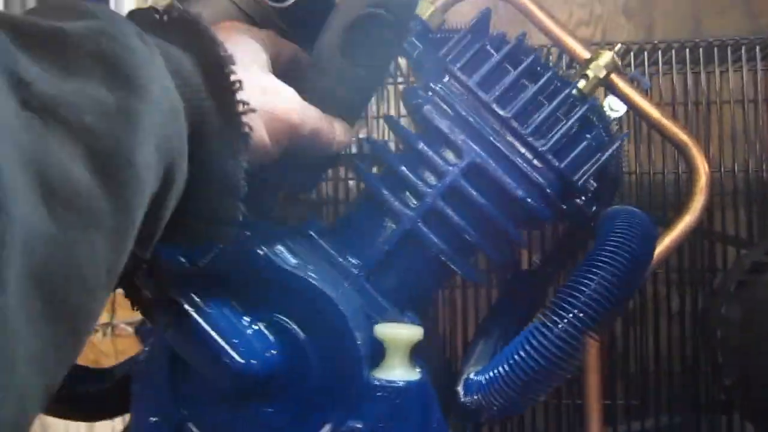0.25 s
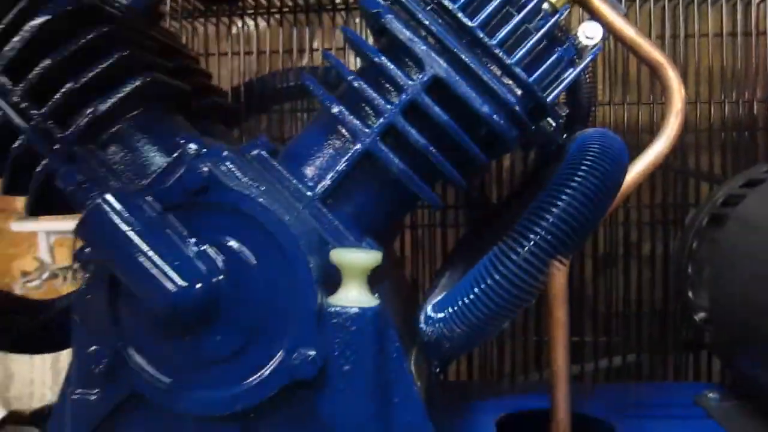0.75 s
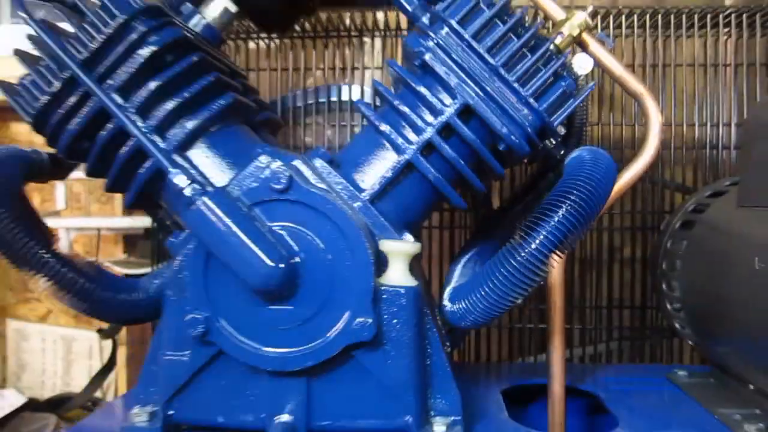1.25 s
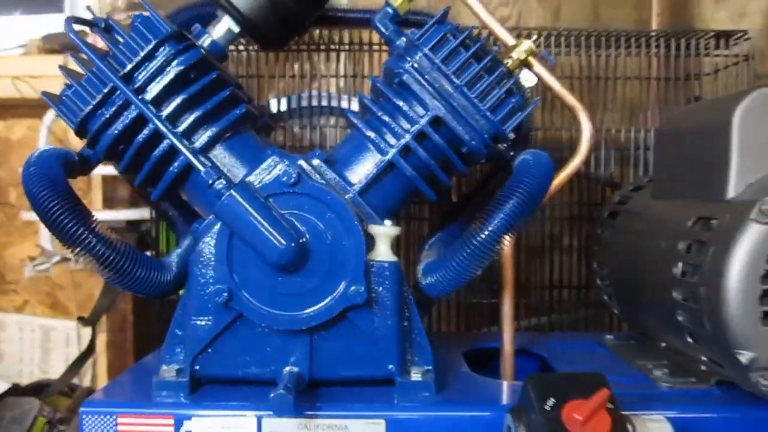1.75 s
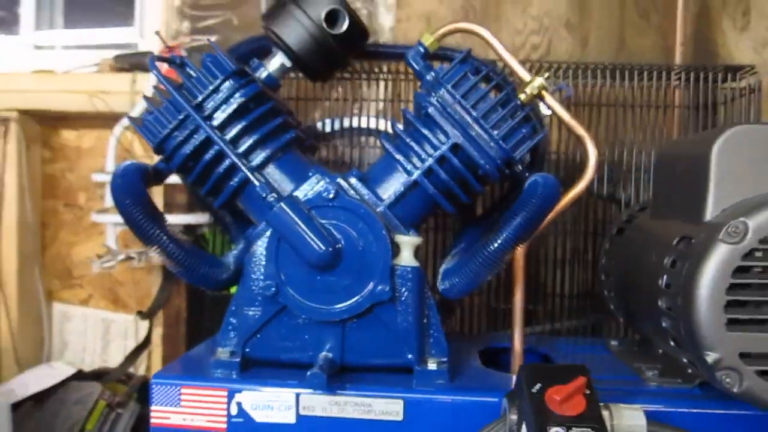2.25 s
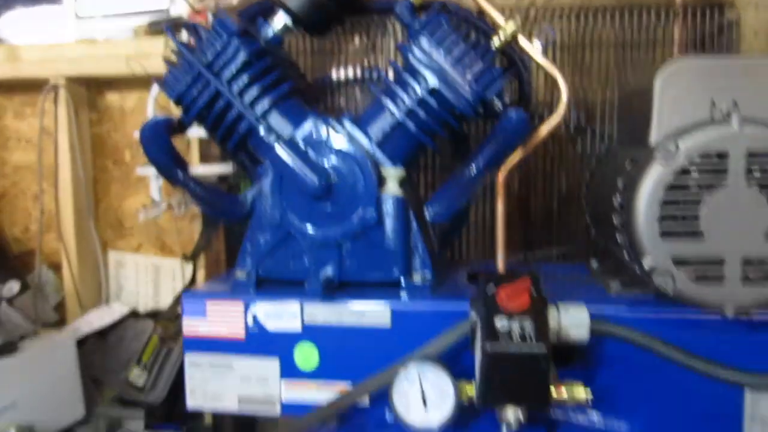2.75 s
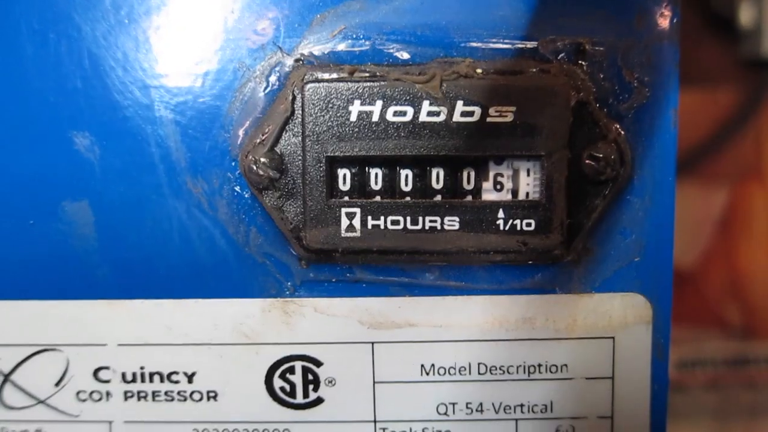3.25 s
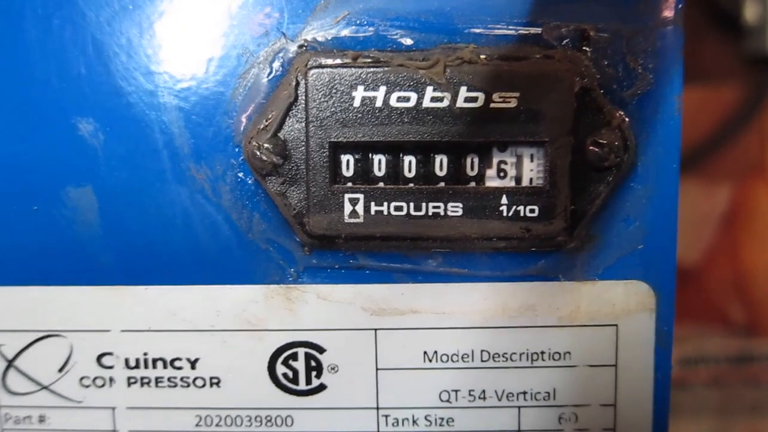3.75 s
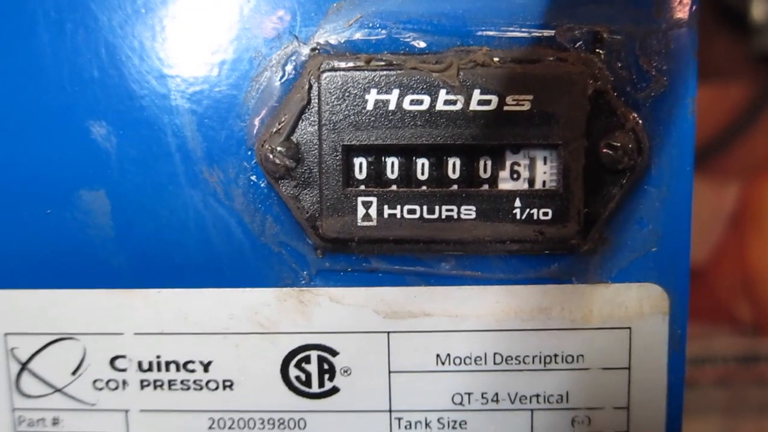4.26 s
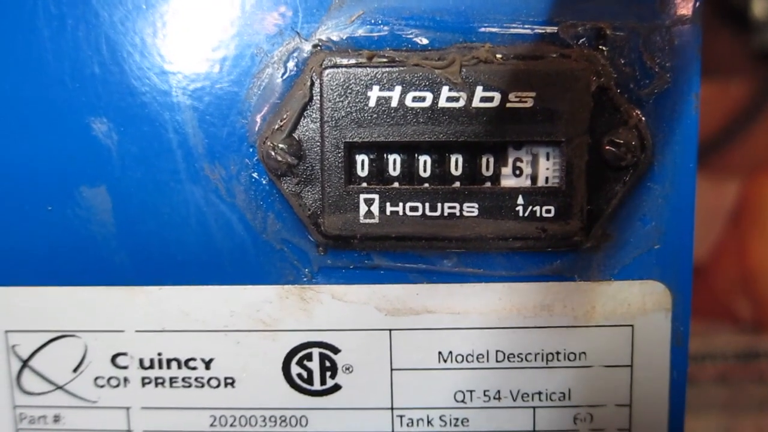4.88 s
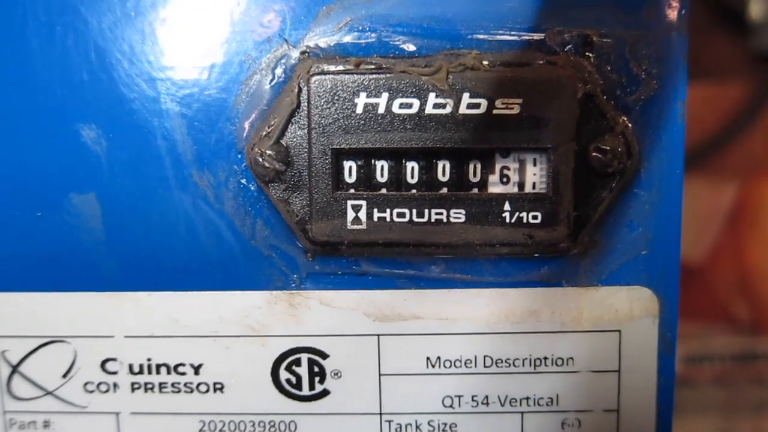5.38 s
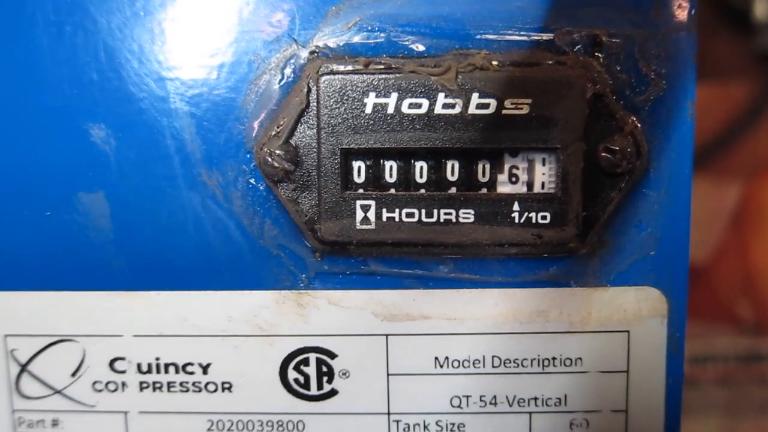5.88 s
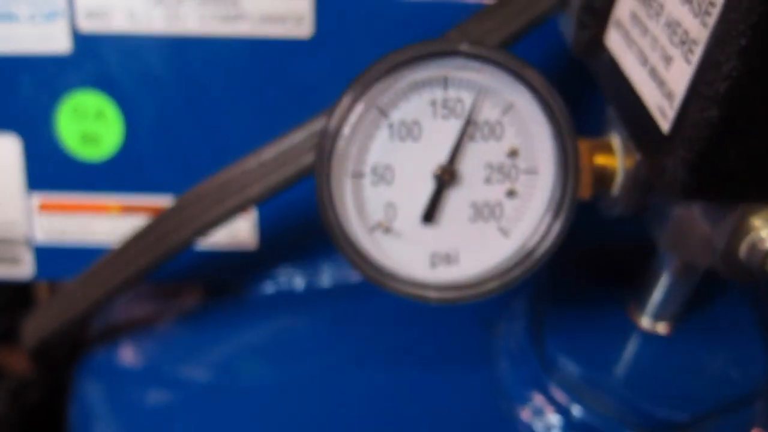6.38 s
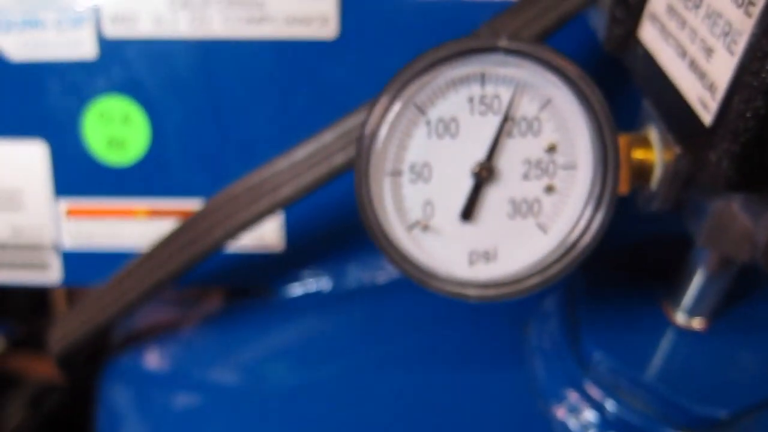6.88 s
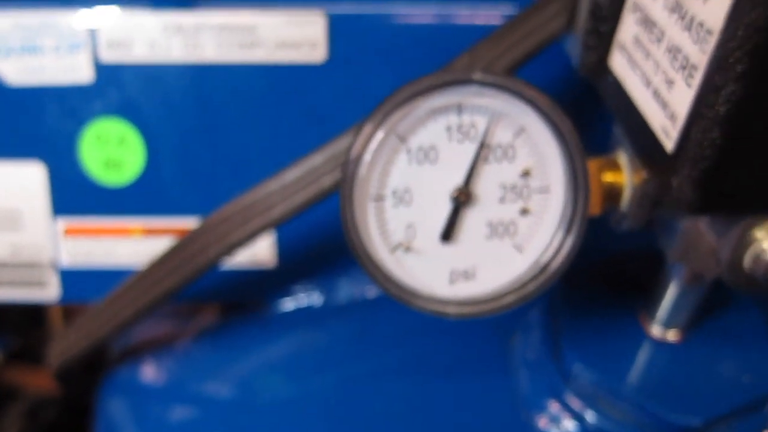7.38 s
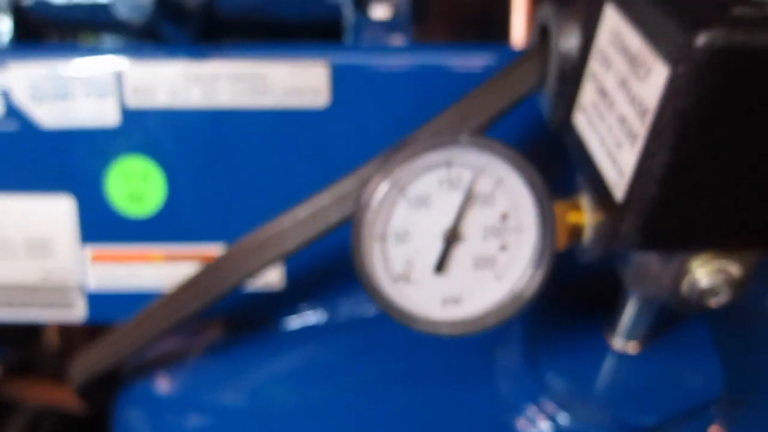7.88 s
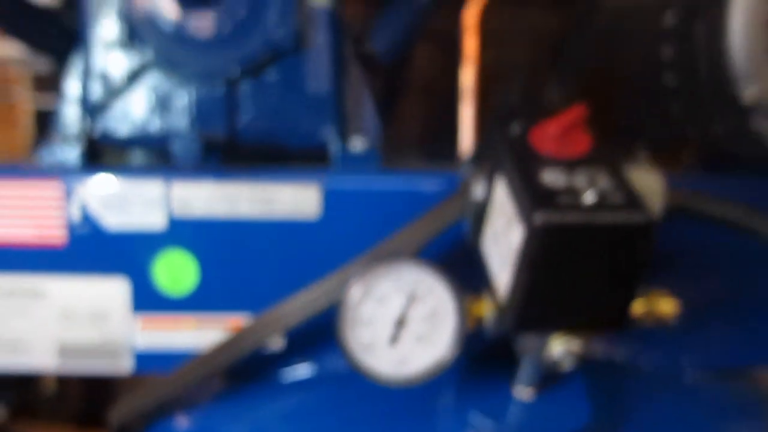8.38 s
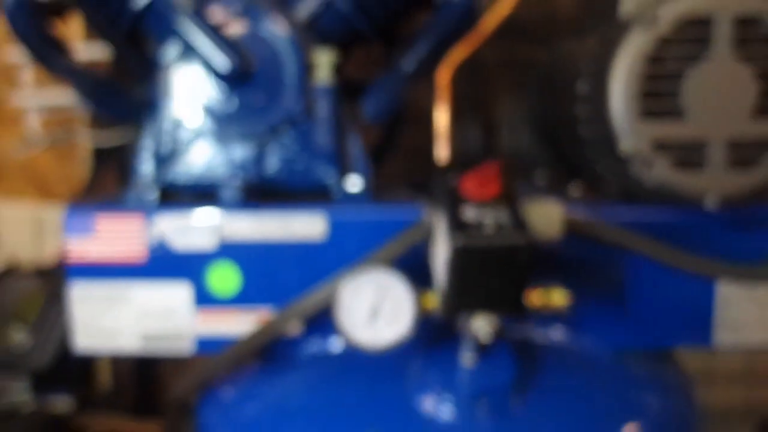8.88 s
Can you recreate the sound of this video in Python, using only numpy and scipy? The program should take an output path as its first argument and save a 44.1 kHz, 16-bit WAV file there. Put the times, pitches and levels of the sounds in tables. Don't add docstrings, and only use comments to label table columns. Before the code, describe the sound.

In a garage, a two-cylinder air compressor runs very close to a handheld stereo microphone, chugging fast with clattering fins and slapping valves. An abrupt cut moves to the tank, where motor whine and ringing steel come forward. Another cut: motor off, a strong air jet hisses, changes colour, weakens and leaves near silence.

```python
import sys
import numpy as np
from scipy import signal
from scipy.fft import rfft, irfft, next_fast_len
from scipy.io import wavfile

SR = 44100
rng = np.random.default_rng(int(sys.argv[2]) if len(sys.argv) > 2 else 0)


def voltage_ratio(decibels):
    exponent = np.asarray(decibels, float) / 20
    return 10 ** exponent


def store_pcm(level_fs):
    pcm = np.round(np.clip(level_fs, -1, 1) * 32767).astype(np.int16)
    wavfile.write(sys.argv[1], SR, np.atleast_2d(pcm).T)


N = 403074
TIME = np.arange(N) / SR
TO_TANK_S, TO_SWITCH_S = 3.054, 6.170

# time in seconds, closeness in dB,
# view of the cooling fins in dB.
HEAD_DRIFT = [(0.0, 0, 1), (0.6, 1.5, 0), (1.0, 0, 0.7), (1.3, -0.5, 0), (2.0, -1.6, 1), (2.5, -.5, 1.5),
              (3.05, 0.4, 2.5)]
TANK_DRIFT = [(3.05, -0.12, -0.0045), (3.6, 0.71, .3), (3.85, -0.82, -0.56), (4.05, 0.54, 0.44),
              (4.35, 0.43, -.3), (4.8, 0.76, 0.89), (5.1, -0.15, -0.16), (5.8, .4, 0.1), (6.17, -0.57, -.3)]
# level in dB, share of closeness, share of fin view.
HEAD_LAYERS = [
    (-21.5, 0.87, .1),
    (-24.5, 1.1, 0.49),
    (-26.5, .2, 1),
    (-34.5, .5, .6),
]
TANK_LAYERS = [
    (-26, 1.05, .1),
    (-19.5, .9, .1),
    (-28.5, .6, 1),
    (-36.5, .6, .6),
]
# multiple of the stroke rate, level in dB.
HEAD_INTAKE = [(1, -9), (2, -1.5), (3, 4), (4, 5), (5, 5.5), (6, 1), (7, 0.5), (8, 5.5), (9, -9), (10, -6),
               (11, -13), (12, -16), (13, 3)]
TANK_INTAKE = [(1, -23), (2, -8), (3, 1.5), (4, -14.5), (5, 3), (6, -0.5), (7, -1.5), (8, 1), (9, -12.5),
               (10, -37), (11, -51.5)]
# mode in Hz, level in dB, t60 in seconds, moment in turns.
HEAD_STEEL = [(2467, -21, .07, .85), (2496, -26.5, 0.04, .35), (656, -24, 0.047, .4),
              (980, -30.5, 0.034, .33), (787, -31.5, 0.14, 0.34), (2165, -20.5, 0.02, 0.79),
              (3750, -32, .06, .36), (4460, -25, 0.016, .87), (10060, -21.5, 0.013, .86)]
TANK_STEEL = [(573.3, -7.5, 0.049, 0.91), (767, -30.5, 0.35, 0.012), (994, -30.5, 0.16, 0.1017),
              (1110, -28.5, 0.053, 0.25), (1229, -21.5, 0.12, .15), (1490, -30.5, 0.062, .25),
              (1620, -30.5, 0.043, .3), (2703, -28.5, 0.12, 0.4), (2320, -27.5, 0.25, .5),
              (9680, -18.5, 0.01, 0.32)]
# multiple of rotor speed, multiple of mains, level in dB rms, wobble in dB.
HEAD_MOTOR = [(0, 2, -31.5, 1), (12, 0, -33, -2.5), (15.96, 0, -58, 3.5), (20.01, 0, -31, .5),
              (20.18, 2, -29.5, -5.5), (21, 2, -41.5, -6), (21.87, 2, -38.5, -3)]
TANK_MOTOR = [(0, 2, -32, .4), (1, 0.47, -56.5, 1.5), (2.97, 0.24, -43.5, 1.5), (12.08, 0, -39, 0.99),
              (19.9, 0, -35.5, 2.5), (19.28, 2, -45.5, 1.9), (20, 2, -18, 0.44), (21.05, 2, -33, 1.7),
              (22.22, 2, -35.5, 2.3)]
# frequency in Hz, density in dB per Hz.
HEAD_CLATTER = [(32, -55), (55, -11), (300, -4.5), (650, -1.5), (1250, -3.5), (1650, -7), (2000, -6),
                (2500, 1), (2900, -3), (5000, -5), (5800, -9.5), (8000, -15), (12000, -43)]
TANK_CLATTER = [(30, -54), (50, -14), (80, -11), (300, -11), (550, -2.5), (1250, -3.5), (1600, -6),
                (2300, 0.5), (3300, -2.5), (5200, -2.5), (5800, -7), (8000, -12.5), (12000, -39)]
HEAD_HISS = [(5000, -70), (8000, -10), (10000, -3.5), (11200, -3.5), (13600, -5), (14400, -11),
             (15200, -22), (16000, -60)]
TANK_HISS = [(5000, -56), (8000, -14.5), (9900, -2), (10600, -3.5), (13700, -6.5), (14400, -13),
             (15000, -43), (16000, -63)]
# frequency in Hz, likeness from 0 to 1.
HEAD_ALIKE = [(100, 0.8), (700, 1), (1500, 0.63), (2400, 0.77), (3000, 0.51), (6000, 0.28), (12000, 0.17)]
TANK_ALIKE = [(100, 0.27), (1200, 1), (2000, 0.24), (5000, 0.16), (12000, 0.1)]
# time in seconds, jet level in dB.
PRESSURE = [(6.17, -22.5), (6.5, -24), (7.0, -25), (7.5, -27.5), (8.0, -33), (8.4, -36), (8.75, -40),
            (9.14, -42.5)]
# time in seconds, tilt from 0 to 1, slant to the jet from 0 to 1.
HAND = [(6.17, 0.04, 0.97), (6.6, 0.05, 1.), (7.1, 0.31, 0.96), (7.3, .85, 0.99), (7.5, 1., 0.95),
        (8.0, 0.9, 0.86), (8.15, 0.8, 0.88), (8.42, 0.32, 0.54), (8.75, .2, 0.32)]
# time in seconds, length in seconds, then low, middle and upper ridge gain in dB.
SWAYS = [
    (6.76, .06, -4, 1, 0.5),
    (6.859, .04, 8, 1, 2.5),
    (7.044, 0.096, -10, 2.5, -0.5),
    (7.196, .07, 1.5, -2.3, 5),
    (7.998, 0.18, 3.5, 2, 0),
]
# time in seconds, rise in seconds, lift in Hz, fall in seconds.
GAPS = [
    (6.79, 0.14, 600, .07),
    (7.18, .12, 570.4, .3),
]
# centre in Hz, width in Hz, level in dB, gain by tilt in dB,
# right port lead in radians, left over right in dB, gain facing the jet in dB.
RIDGES = [(3290, 460, -4.5, 2.5, 0.92, -2.5, -27), (4700, 620, 2.5, 4, 0.81, 0.5, -4),
          (6550, 1000, 1, 1.5, 1.1, -2, 0.3), (9240, 790, -10, -3, 1.7, 9, -14),
          (10900, 1500, 3, -1.5, 3.63, -0.5, -1.5), (13250, 900, -2.5, 3, 3.8, -2, -4),
          (15480, 500, -17, 14, 5.7, 1, 20)]
# frequency in Hz, density in dB per Hz.
JET_COLOUR = [(1000, -35), (1800, -12), (2300, 2), (3600, 4.5), (5700, 1), (7000, -6.5), (9700, -7.5),
              (12000, -5), (14600, -7), (15700, -19), (16000, -55)]
BUFFET_COLOUR = [(15, -48), (25, -9), (232, 0), (651, 1), (831, 1), (1760, 0), (2200, 0), (2860, -19),
                 (4840, -120)]
ROOM_COLOUR = [(25, -8), (60, -3), (200, -4), (450, -5), (780, 2), (1200, 2), (1900, 6.5), (2400, -34)]
# time in seconds, length in seconds, depth in dB.
LULLS = [
    (6.55, 0.025, -1),
    (6.977, 0.033, -4),
]
# time in seconds, level in dB, pitch in Hz.
BUMPS = [
    (8.405, -46, 195),
    (8.645, -57, 190),
    (8.685, -57, 161),
    (8.72, -64, 80),
]


def in_time(rows):
    s, *columns = np.transpose(rows)
    return [np.interp(TIME, s, column) for column in columns]


def at_hz(points, hz):
    point_hz, value = np.transpose(points)
    return np.interp(np.log(hz + 1), np.log(point_hz), value)


def bell(s, length_s):
    return np.exp(-((TIME - s) / length_s) ** 2)


def pan(db):
    return voltage_ratio(np.array([[0.5], [-0.5]]) * db)


def drift(rate):
    r = np.exp(-80 * np.pi * rate / SR)
    slow = signal.lfilter([1], [1, -2 * r, r * r], rng.standard_normal(N // 40 + 4002))[4000:]
    return np.interp(np.arange(N) / 40, np.arange(len(slow)), slow / slow.std())


def butter(sound, order, hz, kind):
    return signal.sosfilt(signal.butter(order, hz, kind, fs=SR, output="sos"), sound)


def noise(spectrum, alike, left_lag=0., turn_hz=1, repeat=0., blur_hz=5000):
    size = next_fast_len(N)
    hz = np.fft.rfftfreq(size, 1 / SR)
    shared, left, right = rfft(rng.standard_normal((3, size)))
    share = np.clip(at_hz(alike, hz), 0, 1)
    late = np.exp(-2j * np.pi * hz * left_lag / SR)
    pair = np.sqrt(share) * shared * [late, np.ones_like(late)]
    pair = pair + np.sqrt(1 - share) * np.array([left, right])
    again = np.clip(repeat, 0, .9) * np.exp(-hz / blur_hz)
    pair = pair * np.sqrt(1 - again ** 2) / (1 - again * np.exp(-2j * np.pi * hz / turn_hz))
    out = irfft(pair * voltage_ratio(at_hz(spectrum, hz)), size)[:, :N]
    return out / out.std()


def ridge(hz, width_hz, lead, own):
    base = rng.standard_normal((3, N)) + 1j * rng.standard_normal((3, N))
    base = butter(base, 3, 500, "low")
    stretched = np.cumsum(np.broadcast_to(width_hz / 1000, N)) % (N - 1)
    shared, left, right = [np.interp(stretched, np.arange(N), b) for b in base]
    pair = np.array([shared * np.exp(-1j * lead) + own * left, shared + own * right])
    cycles = np.cumsum(np.broadcast_to(hz, N)) / SR
    out = np.real(pair * np.exp(2j * np.pi * cycles))
    return out / out.std()


def wash_db():
    withdraw_s = 7.52
    sag = -3.5 * (TIME - TO_SWITCH_S)
    drop = -17 * (.5 + .5 * np.tanh((TIME - withdraw_s) / .15))
    fade = -8.5 * np.clip(TIME - withdraw_s, 0, None)
    lulls = sum(db * bell(s, length_s) for s, length_s, db in LULLS)
    return -28.5 + sag + drop + fade + lulls


def quiet_garage():
    away = np.clip((TIME - 7.52) / 0.3, 0, 1)
    wash = (1 - away) * voltage_ratio(5.5 + 0.44 * drift(12)) * noise(BUFFET_COLOUR, [(100, 0.32), (2000, 0.22)])
    room = away * voltage_ratio(7.5) * noise(ROOM_COLOUR, [(100, .98), (200, 0.99)])
    hum = voltage_ratio(-64 + 1.4 * drift(4)) * np.sin(2 * np.pi * 310 * TIME + 0.76 * drift(8.9))
    bumps = np.zeros(N)
    for s, db, hz in BUMPS:
        bumps += voltage_ratio(db) * bell(s + .01, 1.13 / hz) * np.sin(2 * np.pi * hz * (TIME - s))
    gust = voltage_ratio(-32.5) * bell(6.58, .12) * ridge(240, 90, 0., 1.0)
    return voltage_ratio(wash_db()) * (wash + room) + hum + bumps + gust


def stepping_back():
    tone = np.sqrt(2) * np.sin(2 * np.pi * 3620 * TIME + 0.52 * drift(7.3))
    whistle = voltage_ratio(-35) * bell(2.9, .14) * tone
    breath = voltage_ratio(-29) * bell(2.94, .4) * ridge(4100, 1000, 0., .6)
    return whistle + breath


def low_ridge(low_db, low_sway_db, tilt, aslant):
    lift_hz = np.zeros(N)
    for s, rise_s, hz, fall_s in GAPS:
        lift_hz += hz * np.where(TIME < s, bell(s, rise_s), np.exp(-np.abs(TIME - s) / fall_s))
    width_hz = 950 * (1 - .25 * tilt) - 56 * np.clip(low_sway_db, None, 4.0)
    band = ridge(2582 + lift_hz, width_hz, .5 * aslant, 0.23 * aslant)
    return voltage_ratio(low_db + .5 * drift(30)) * band * pan(-2.4 * tilt)


def steady_ridges(jet_db, sways_db, tilt, aslant):
    out = np.zeros((2, N))
    for row, sway_db in zip(RIDGES, sways_db):
        hz, width_hz, trim_db, tilt_db, lead, pan_db, facing_db = row
        gain_db = jet_db + sway_db + trim_db + tilt_db * tilt + facing_db * (1 - aslant) + .5 * drift(18)
        band = ridge(hz, width_hz, lead * aslant * (1 - 0.034 * tilt), 0.39 * aslant * (1 - 0.55 * tilt))
        out += voltage_ratio(gain_db) * band * pan(pan_db)
    return out


def sliding_band():
    slide = (TIME - 7.07) / 0.12
    hz = 4640 - 238 * np.clip(slide + 1, 0, 3) ** 2
    return voltage_ratio(-21.5) * np.exp(-slide ** 2) * ridge(hz, 330, .8, 0.33) * voltage_ratio([[-2.5], [1.5]])


def unloader():
    jet_db, = in_time(PRESSURE)
    tilt, aslant = in_time(HAND)
    low, middle, upper = sum(bell(s, length_s) * np.array(db)[:, None] for s, length_s, *db in SWAYS)
    low_db = jet_db + low + 2.5 + 8 * tilt - 23.5 * (1 - aslant)
    out = low_ridge(low_db, low, tilt, aslant)
    out += steady_ridges(jet_db, [.4 * low, middle, upper, 0, 0, 0, 0], tilt, aslant)
    out += sliding_band()
    between_db = jet_db + (middle + upper) / 2 - 0.5 * tilt * aslant + 4.5
    out += voltage_ratio(between_db) * noise(JET_COLOUR, [(2000, 1.0), (9000, 0.18)], 0.47)
    passed = butter(out, 3, 1690, "high")
    return passed + voltage_ratio(-21.5) * out + voltage_ratio(low_db - 27) * ridge(1500, 1400, .2, 0.23)


def motor(rotor_hz, tones):
    out, slip = np.zeros(N), 0.0036 * drift(1.9)
    for rotor, mains, db, wobble_db in tones:
        hz = round(rotor) * rotor_hz + round(mains) * 60.0
        cycles = hz * TIME + rotor * slip + rng.random()
        waver_db = np.clip(wobble_db, 0, 2) * 2.5 * np.tanh(drift(2.2) / 0.65)
        out += np.sqrt(2) * voltage_ratio(db + waver_db) * np.sin(2 * np.pi * cycles)
    return out


def ring(clicks, hz, t60):
    r, w = voltage_ratio(-60 / (t60 * SR)), 2 * np.pi * hz / SR
    return signal.lfilter([0, np.sin(w)], [1, -2 * r * np.cos(w), r * r], clicks + 1e-18)


def steel(crank_hz, modes, spread_db, rise):
    out, count = np.zeros(N), np.arange(int(N / SR * crank_hz) - 1)
    for hz, db, t60, moment in modes:
        clicks = np.zeros(N)
        slap = ((count + moment) / crank_hz * SR).astype(int)
        clicks[slap] = voltage_ratio(db + spread_db * rng.standard_normal(len(count)))
        swelling = ring(clicks, hz, rise / hz)
        out += ring(swelling, hz, t60) * 2 * np.log(1000) * hz / rise / SR
    return out


def intake(turns, orders, shape, wobble_db):
    start, lead, sweep = shape
    out = np.zeros(N)
    for k, db in orders:
        cycles = 2 * k * turns + start + lead * k + sweep * k * k
        out += voltage_ratio(db + wobble_db * drift(15.0)) * np.cos(2 * np.pi * cycles)
    return out / out.std()


def running(crank_hz, rotor_hz, curve, layers, orders, shape, modes, tones, clatter, hiss, alike,
            left_lag, puff_db, puff_turn, pan_db, repeat):
    close_db, view_db = in_time(curve)
    thump_db, frame_db, clatter_db, hiss_db = [db + close * close_db + view * view_db
                                               for db, close, view in layers]
    turns = crank_hz * TIME
    puff = puff_db * np.cos(2 * np.pi * (turns - puff_turn))
    stroke = 0.37 * np.cos(4 * np.pi * (turns - puff_turn))

    body = voltage_ratio(thump_db + 1.25) * intake(turns, orders, shape, 0.41)
    body += voltage_ratio(0.3 * close_db + 0.586 * view_db) * steel(crank_hz, modes, 0.93, rise=24.3)
    body += voltage_ratio(1.45 * close_db - .5 * view_db) * motor(rotor_hz, tones)
    late = np.interp(np.arange(N) - left_lag, np.arange(N), body)

    rattle = noise(clatter, alike, left_lag, crank_hz, repeat, blur_hz=9000)
    frame = butter(rattle, 2, 1400, "low")
    fins = butter(rattle, 2, 1400, "high")
    air = voltage_ratio(stroke) * (voltage_ratio(frame_db + 3) * frame - voltage_ratio(clatter_db + 2) * fins)
    air += voltage_ratio(hiss_db + 5.0 + puff) * noise(hiss, alike, left_lag)
    return (np.array([late, body]) + air) * pan(pan_db)


def scene():
    head = running(22.522, 57.78, HEAD_DRIFT, HEAD_LAYERS, HEAD_INTAKE, (-.43, .182, .0068), HEAD_STEEL,
                   HEAD_MOTOR, HEAD_CLATTER, HEAD_HISS, HEAD_ALIKE,
                   left_lag=-0.58, puff_db=0.5, puff_turn=0.94, pan_db=0.0, repeat=0.63)
    tank = running(22.571, 57.90, TANK_DRIFT, TANK_LAYERS, TANK_INTAKE, (.43, 0., 0.), TANK_STEEL,
                   TANK_MOTOR, TANK_CLATTER, TANK_HISS, TANK_ALIKE,
                   left_lag=-1.49, puff_db=1.2, puff_turn=0.66, pan_db=1.2, repeat=0.38)
    head += stepping_back()
    tank *= voltage_ratio(3.5 * np.exp(-np.abs(TIME - TO_TANK_S) / 0.016))
    switch = unloader() + quiet_garage()
    splice_s = 0.0029
    first, second = [np.clip((TIME - cut) / splice_s + .5, 0, 1) for cut in (TO_TANK_S, TO_SWITCH_S)]
    return head * (1 - first) + tank * (first - second) + switch * second


def band_limit(x):
    return signal.sosfilt(signal.butter(12, 15910, fs=SR, output="sos"), x)


def record(dry):
    notch_hz, width_hz = 8270, 1150
    notched = butter(dry, 3, [notch_hz - width_hz / 2, notch_hz + width_hz / 2], "bandstop")
    rounded = 0.91 * np.tanh(notched / 0.95)
    low_cut = butter(rounded, 2, 30, "high")
    top_cut = signal.ellip(10, .5, 60, 15730, fs=SR, output="sos")
    return band_limit(signal.sosfilt(top_cut, low_cut))


dry = scene()
out = record(dry)
store_pcm(out)
```